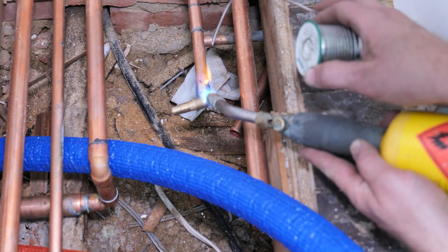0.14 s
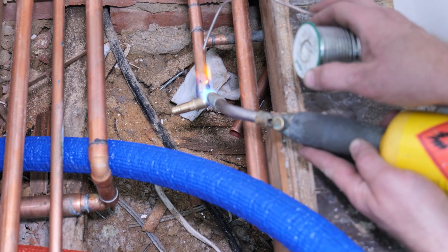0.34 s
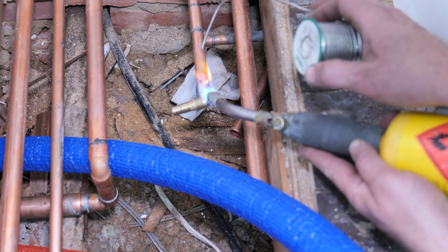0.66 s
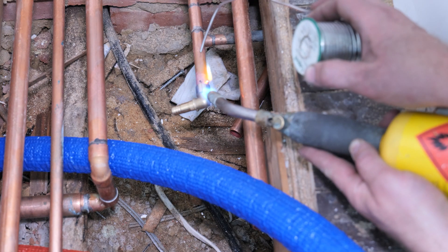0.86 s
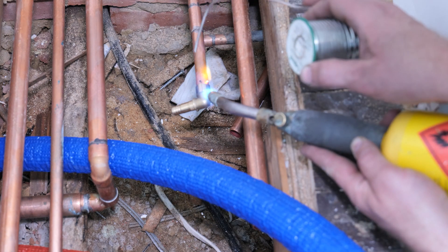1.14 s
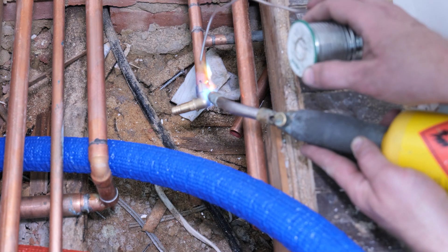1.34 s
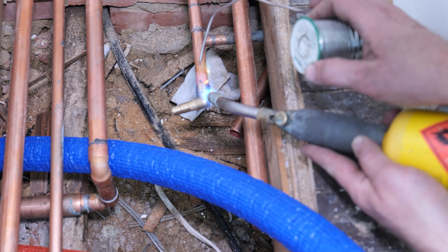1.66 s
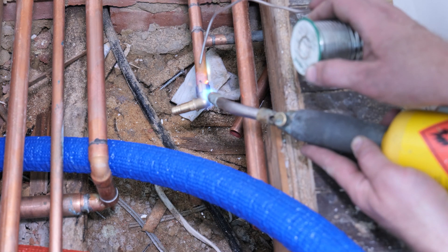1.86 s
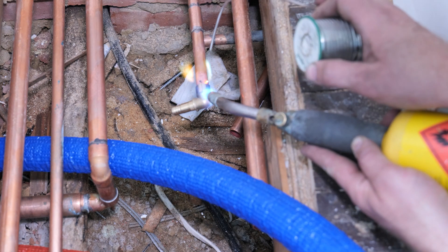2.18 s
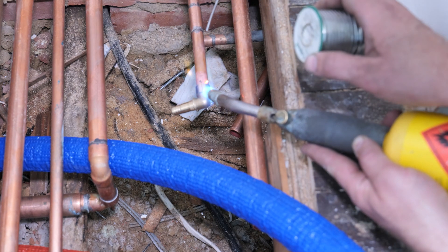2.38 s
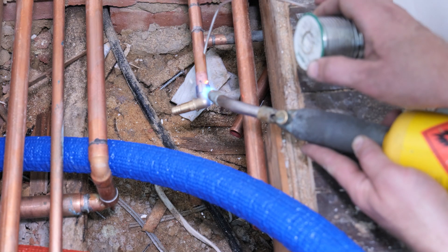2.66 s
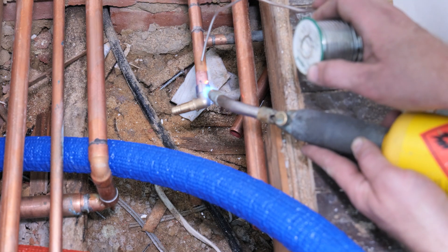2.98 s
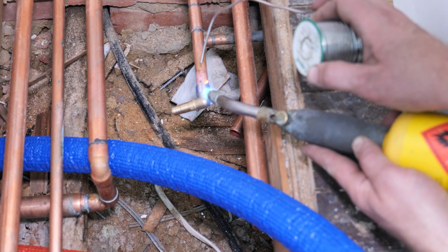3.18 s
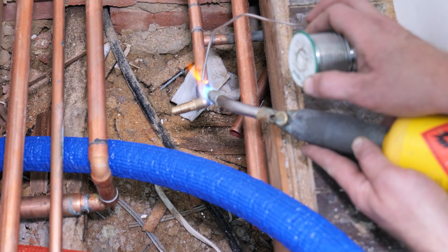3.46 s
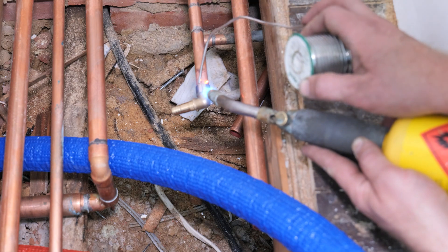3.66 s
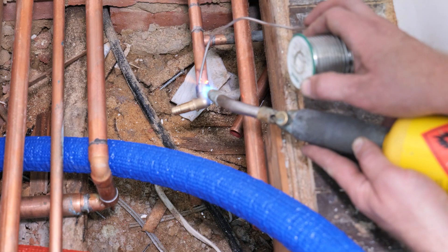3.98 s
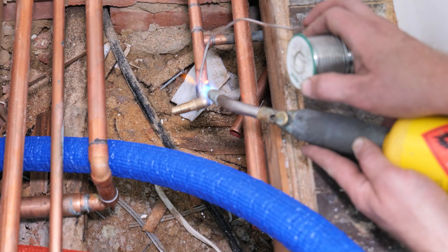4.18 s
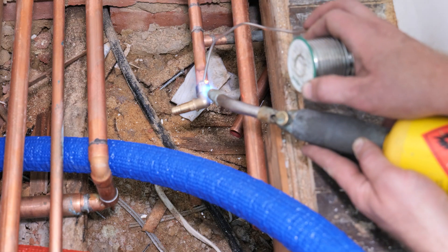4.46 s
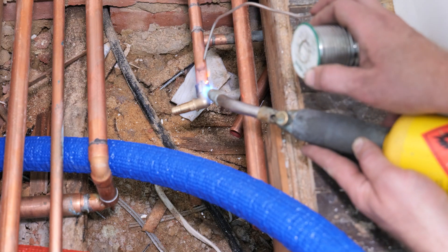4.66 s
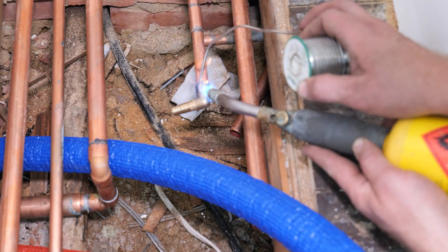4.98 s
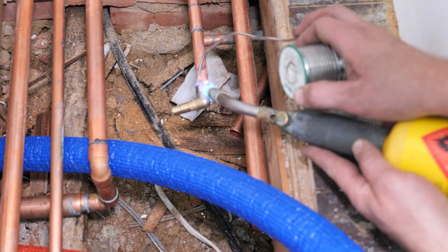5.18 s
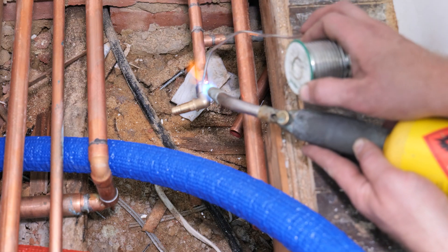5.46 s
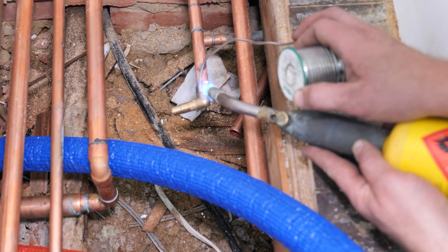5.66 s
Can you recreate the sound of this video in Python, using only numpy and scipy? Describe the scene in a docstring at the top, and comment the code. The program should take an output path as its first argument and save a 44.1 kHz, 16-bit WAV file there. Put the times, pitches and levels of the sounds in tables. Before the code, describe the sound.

Close, steady blowtorch noise: dense, breathy midrange roar, lighter hiss above and little deep bass. A hoarse, unstable whistle from the burner tube runs throughout, trembling quickly and sagging for an instant several times, more often in the second half. The torch is already lit at the start and still burning at the end, in a small, dry indoor space.

```python
"""A steady hiss and roar with a rough, fluttering note inside: a handheld gas blowtorch burns against
a brass fitting in an open bay between floor joists. The gas jet and the turbulent flame are shaped noise;
the burner tube's note is an unsteady sine with an overtone, sagging in pitch whenever the flame gutters.
Joists, pipes and the room send the sound back and colour it with fixed peaks and nulls."""
import sys
import numpy as np
from scipy import signal
from scipy.fft import rfft, irfft, next_fast_len
from scipy.io import wavfile
from scipy.ndimage import uniform_filter1d, map_coordinates

SR = 44100
rng = np.random.default_rng(int(sys.argv[2]) if len(sys.argv) > 2 else 0)


def bounce(signal):
    """Save signal as a 16-bit WAV file at the path given by the first command-line argument."""
    frames = np.transpose(np.atleast_2d(signal))
    limited = np.clip(frames, -1, 1)
    pcm = np.round(limited * 32767).astype(np.int16)
    wavfile.write(sys.argv[1], SR, pcm)


N = 257103
TIME = np.arange(N) / SR  # [s]


def amp(db):
    """Decibels to gain."""
    return 10 ** (np.asarray(db) / 20)


def unit(x):
    """x at rms 1."""
    return x / np.sqrt(np.mean(np.abs(x) ** 2) + 1e-20)


def wobble(rate):
    """A smooth random curve of rms 1, with rate knots a second."""
    knots = rng.standard_normal(int(N * rate / SR) + 4)
    return unit(map_coordinates(knots, [TIME * rate]))


def filtered(x, response):
    """x times a response of frequency, padded so that its tail does not wrap round."""
    size = next_fast_len(N + SR // 2)
    hz = np.fft.rfftfreq(size, 1 / SR)
    return irfft(rfft(x, size) * response(hz), size)[:N]


def rush(spectrum):
    """Noise with the given density, joined up in decibels over log frequency."""
    hz, db = np.transpose(spectrum)
    white = rng.standard_normal(N) * np.sqrt(SR / 2)  # 0 dB per Hz
    return filtered(white, lambda f: amp(np.interp(np.log(f + 1), np.log(hz), db)))


def scatter(x, t60, wet, above_hz):
    """Many small reflections, a noise tail falling 60 dB in t60 seconds, take over a share of the power."""
    t = TIME[:SR // 2]
    decay = amp(-60 * t / t60)
    build_up = 1 - np.exp(-t / 0.00075)
    tail = rng.standard_normal(len(t)) * decay * build_up
    tail /= np.linalg.norm(tail)

    def share(f):
        # rises towards wet above the corner frequency
        return np.clip(wet, 0, .9) * f ** 4 / (f ** 4 + above_hz ** 4)

    direct = filtered(x, lambda f: np.sqrt(1 - share(f)))
    reflected = signal.fftconvolve(x, tail)[:N]
    return direct + filtered(reflected, lambda f: np.sqrt(share(f)))


# echoes off the nearest pipes, joists and boards, before dulling: (delay [ms], share of the pressure [ratio])
ECHOES = [(1.196, 0.073), (1.415, 0.11), (1.857, 0.043), (2.034, 0.15), (3.346, 0.11), (3.388, 0.071),
          (3.819, 0.014), (4.603, 0.15), (6.539, 0.12), (8.389, 0.082), (9.591, 0.038)]
# standing waves at the microphone, peaks and nulls: (centre [Hz], width [Hz], level [dB])
STANDING = [(138, 21, 5.5), (412, 21.6, -14), (477.4, 31, 9), (617.5, 19.5, 9), (644, 14, -10),
            (933, 10.4, -7), (1044, 11, 9), (1155, 14, -17), (1221, 12.3, 10), (1224, 15, -2),
            (1350, 34, 3.5), (1369, 24, -6), (1400, 28, 4.5), (1515, 79, -9), (1725, 27, -15),
            (1913, 27, -16), (2176, 27, 12), (2210, 90, 0), (2418, 134, 6.5), (2623, 18, -9),
            (2687, 170, 3), (3040, 60, -22), (3576, 28, -17), (3675, 39, 6.5), (3890, 82, -16),
            (4720, 42, 0.5), (4800, 150, -0.5), (6144, 210, 10), (6520, 150, -13), (7590, 37, 2),
            (8590, 380, -6), (11080, 53, 4), (14350, 300, 6)]


def floor_bay(x, dull_hz):
    """Near surfaces add echoes that lose treble; standing waves lift and cancel narrow bands."""
    def response(f):
        echoes = sum(share * np.exp(-2j * np.pi * f * ms * 1e-3) for ms, share in ECHOES)
        dulling = 1 / np.sqrt(1 + (f / dull_hz) ** 2)
        standing_db = sum(db / (1 + (2 * (f - hz) / width) ** 2) for hz, width, db in STANDING)
        return (1 + echoes * dulling) * amp(standing_db)
    return filtered(x, response)


# noise of gas leaving the jet, before flicker and reflections: (frequency [Hz], density [dB per Hz])
HISS = [(1000, -110), (3000, -73), (3900, -67), (4900, -68), (6200, -76), (7400, -71), (9300, -74),
        (9650, -81), (15600, -80)]


def gas_jet(surge, surge_db, flicker_db):
    """The hiss of the jet swells a little with each surge of the flame."""
    return rush(HISS) * amp(surge_db * surge + flicker_db * wobble(30))


# noise of turbulent burning, before flicker and reflections: (frequency [Hz], density [dB per Hz])
ROAR = [(25, -116), (100, -98), (190, -77), (235, -60), (300, -63.5), (400, -70.5), (730, -69), (860, -56),
        (1500, -51.5), (1830, -52.5), (2200, -69), (2830, -53), (3900, -71.5), (7000, -100)]


def flame_roar(heat, split_hz, tilt_db, flicker_db):
    """Turbulent burning: a hotter flame roars brighter, a cooler one deeper."""
    roar = rush(ROAR)
    low = filtered(roar, lambda f: 1 / (1 + (f / split_hz) ** 8))
    high = roar - low
    # the two bands flicker independently
    deep = low * amp(-tilt_db * heat + flicker_db * wobble(25))
    bright = high * amp(.4 * tilt_db * heat + flicker_db * wobble(25.07))
    return deep + bright


# the tube's note drifts with the heat of the burner: (time [s], pitch [Hz])
DRIFT = [(0, 1310), (.6, 1336), (1.15, 1321), (2.15, 1356), (2.85, 1326), (3.6, 1326), (4.55, 1337),
         (5.2, 1325), (5.8, 1349)]
# the flame gutters and the note sags; a negative level drop is a lift:
# (time at the deepest [s], length [s], pitch drop [Hz], level drop [dB])
GUTTERS = [(0.271, .14, 69, 4.5), (0.844, 0.046, 42, -1), (3.425, 0.072, 12.5, 8), (3.595, .07, 53, -1.5),
           (3.78, 0.052, 29.35, 4), (4.042, .04, 21.5, 6), (4.269, 0.0816, 63.7, 4.5),
           (4.438, 0.048, 44, 11), (4.778, 0.043, 60, -1.5), (5.04, 0.047, 45, 3)]
NOTE_DB = -20  # rms level of the note in a steady flame, before reflections
# each quick surge lifts pitch and level together: knots per second, rms pitch [Hz], rms level [dB]
FLUTTER_PER_S, FLUTTER_HZ, FLUTTER_DB = 42, 13.6, 0.62
RECOVER_S = 0.097  # averaging window [s]: the steady gas feed evens out slower surges


def flame_state():
    """Pitch and level of the tube's note: slow drift, quick flutter and a bell-shaped dent at each gutter."""
    eddies = wobble(FLUTTER_PER_S)
    slow_surges = uniform_filter1d(eddies, int(RECOVER_S * SR))
    flutter = unit(eddies - slow_surges)
    note_hz = np.interp(TIME, *np.transpose(DRIFT)) + FLUTTER_HZ * flutter
    note_db = NOTE_DB + FLUTTER_DB * flutter
    for deepest_s, length_s, drop_hz, drop_db in GUTTERS:
        sag = np.exp(-(2 * (TIME - deepest_s) / length_s) ** 2)
        note_hz = note_hz - drop_hz * sag
        note_db = note_db - drop_db * sag
    return note_hz, note_db


def burner_note(note_hz, note_db, jitter_hz, falter_db, shake_db, overtone_db):
    """The flame's heat keeps the tube oscillating; turbulence jostles its pitch and makes it falter."""
    jostle = .35 * wobble(90) + .9 * wobble(320)
    phase = 2 * np.pi * np.cumsum(note_hz + jitter_hz * jostle) / SR
    # the oscillation sits at its ceiling, so strong eddies can only knock it down
    falter = np.maximum(wobble(105), 0) ** 1.5
    strength = amp(shake_db * wobble(220) - falter_db * falter)
    # the tube's second mode lies a little above the octave
    overtone = amp(overtone_db) * np.sin(2.08 * phase + wobble(300))
    return amp(note_db) * unit(strength * (np.sin(phase) + overtone))


def scene():
    """The torch in the bay, scattered by rubble and pipes, then by the room."""
    note_hz, note_db = flame_state()
    heat = unit(note_hz - note_hz.mean())  # hotter gas raises the tube's note
    surge = unit(note_db - note_db.mean())
    hiss = gas_jet(surge, surge_db=0.07, flicker_db=0.48)
    roar = flame_roar(heat, split_hz=1900, tilt_db=0.32, flicker_db=.5)
    note = burner_note(note_hz, note_db, jitter_hz=34, falter_db=5, shake_db=2.07, overtone_db=-15)
    bay = floor_bay(hiss + roar + note, dull_hz=7060)
    near = scatter(bay, t60=0.045, wet=0.14, above_hz=4000)
    return scatter(near, t60=0.12, wet=0.19, above_hz=2550)[None]


TOP_HZ = 15780  # band limit


def record(dry):
    """A sharp cut removes everything from the band limit upwards."""
    return filtered(dry[0], lambda f: f < TOP_HZ)[None]


dry = scene()
out = record(dry)
bounce(out)
```